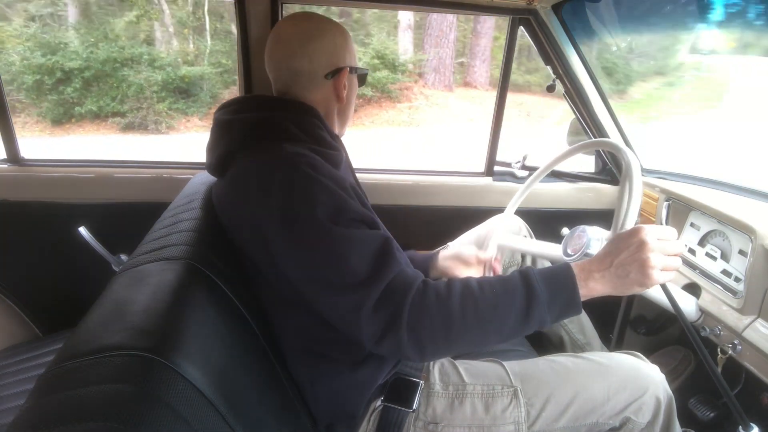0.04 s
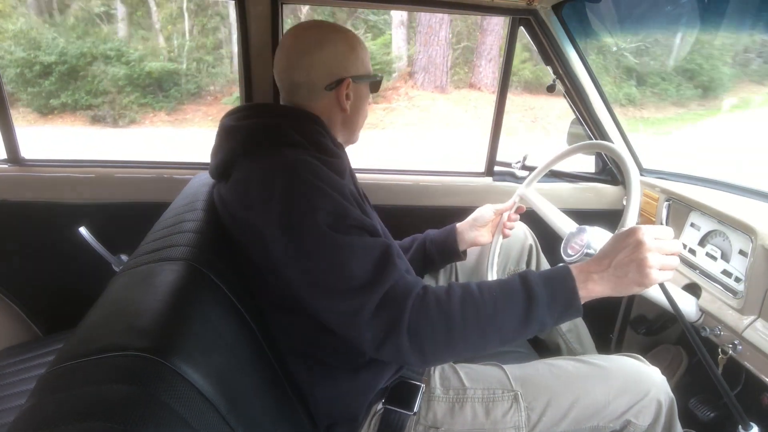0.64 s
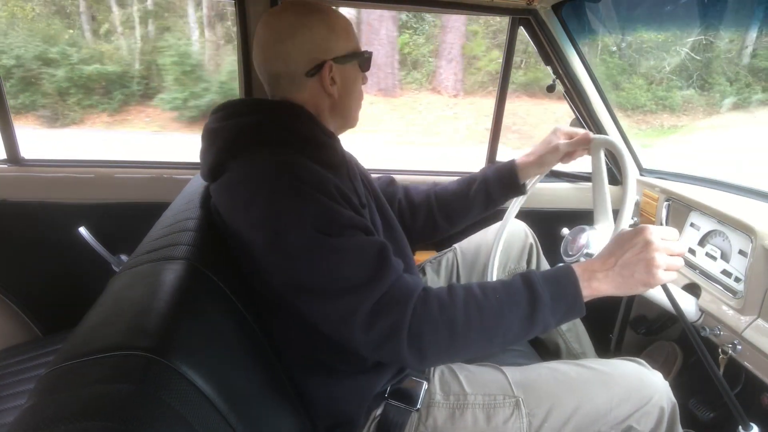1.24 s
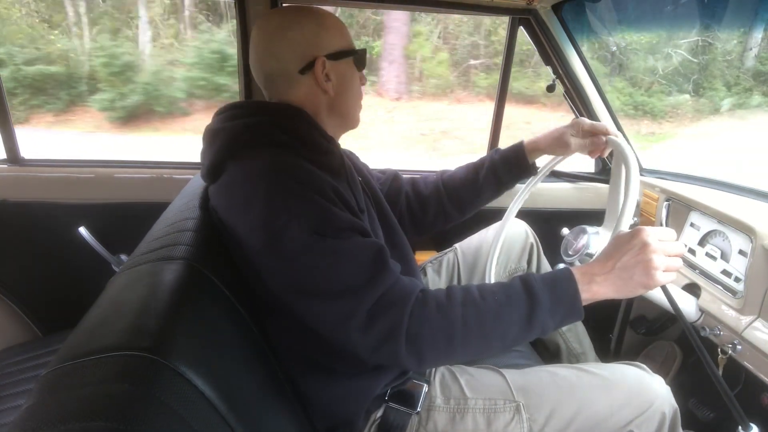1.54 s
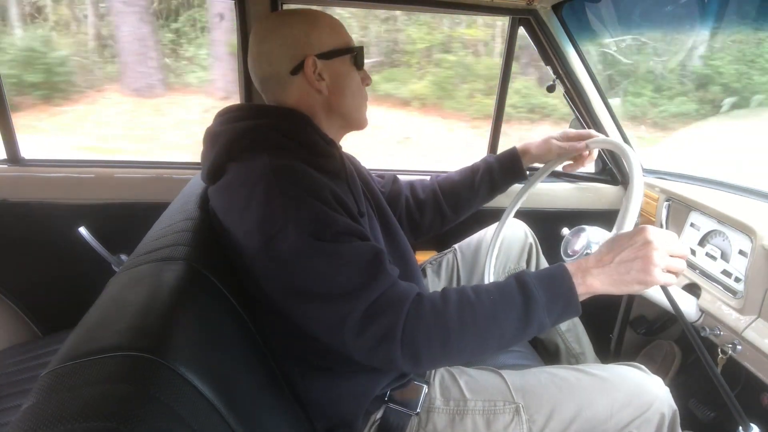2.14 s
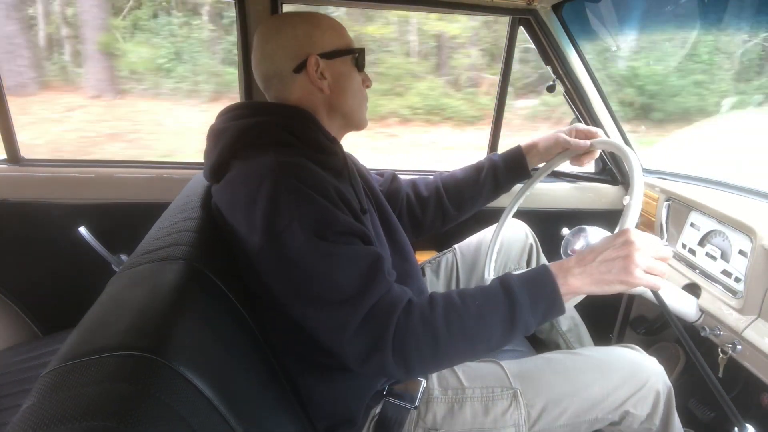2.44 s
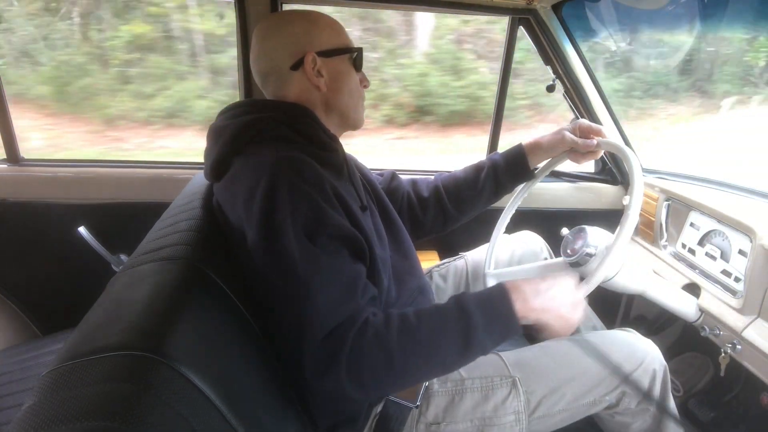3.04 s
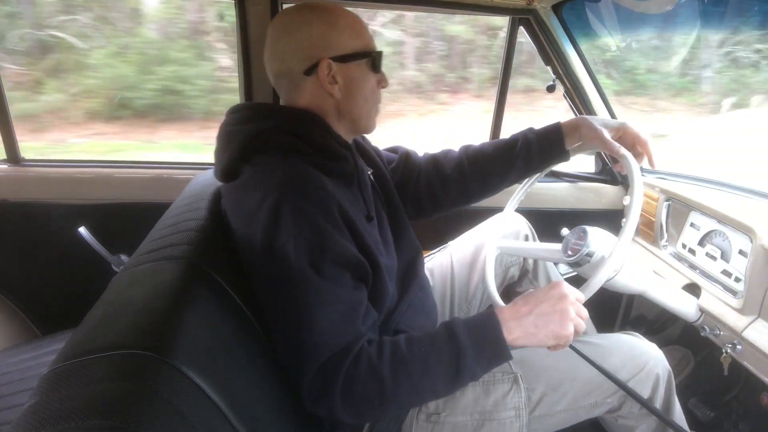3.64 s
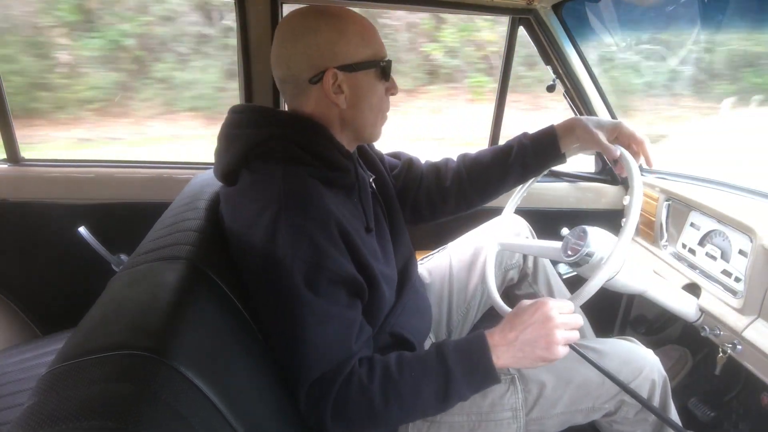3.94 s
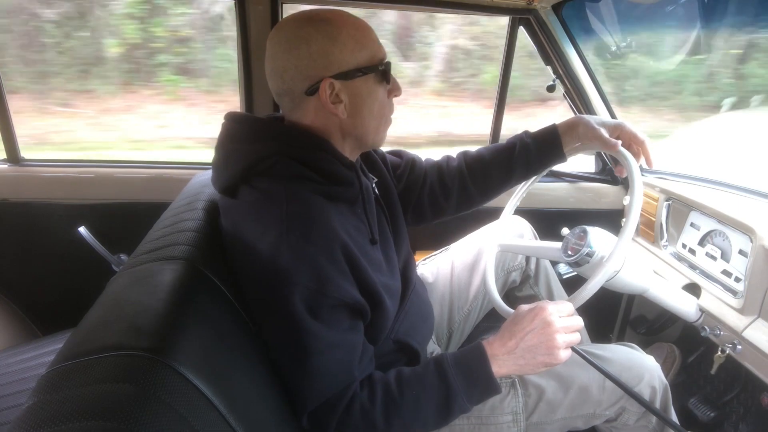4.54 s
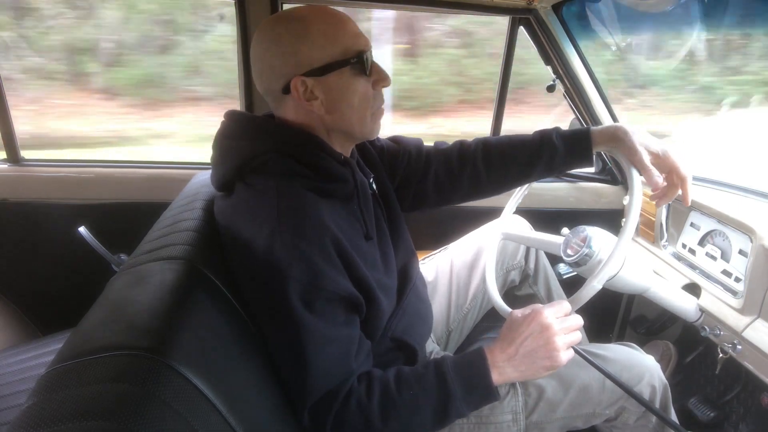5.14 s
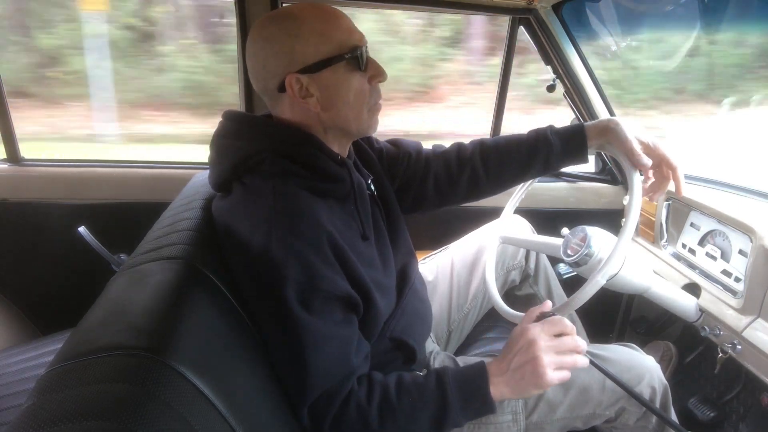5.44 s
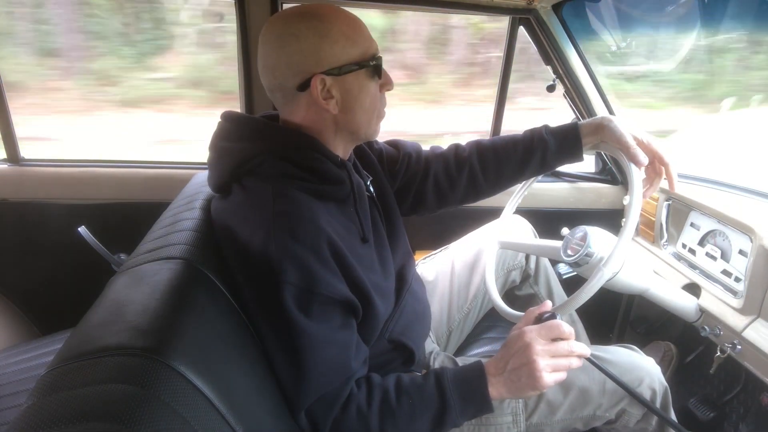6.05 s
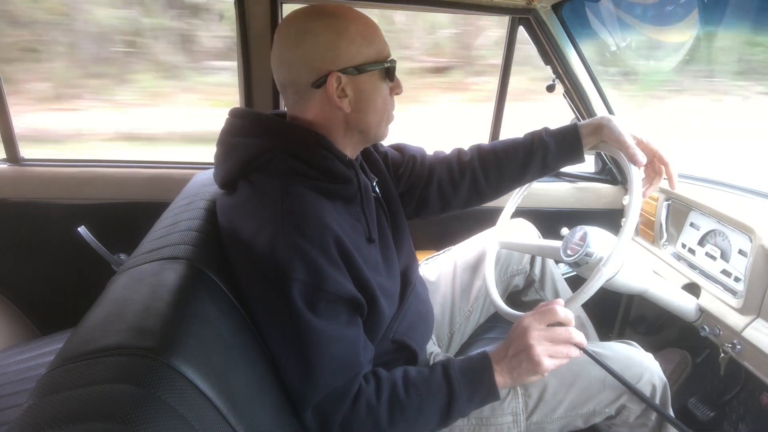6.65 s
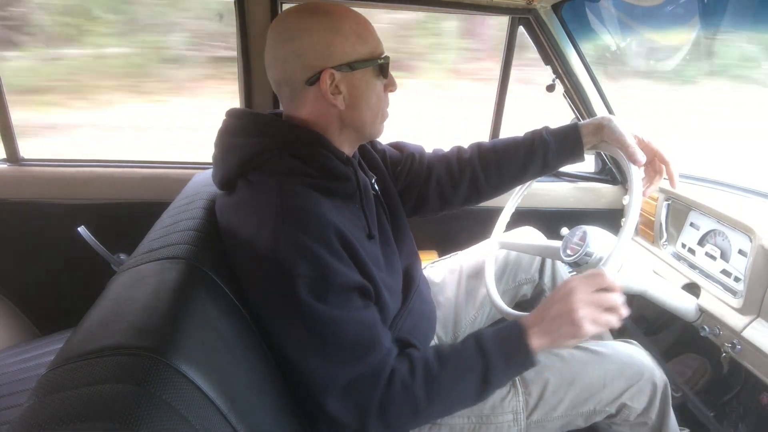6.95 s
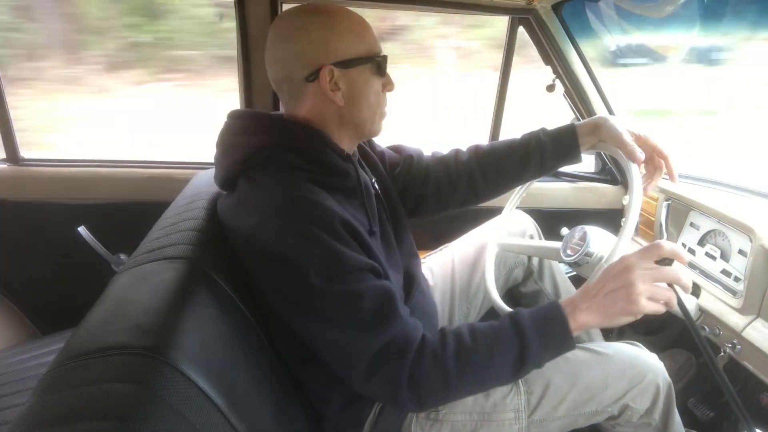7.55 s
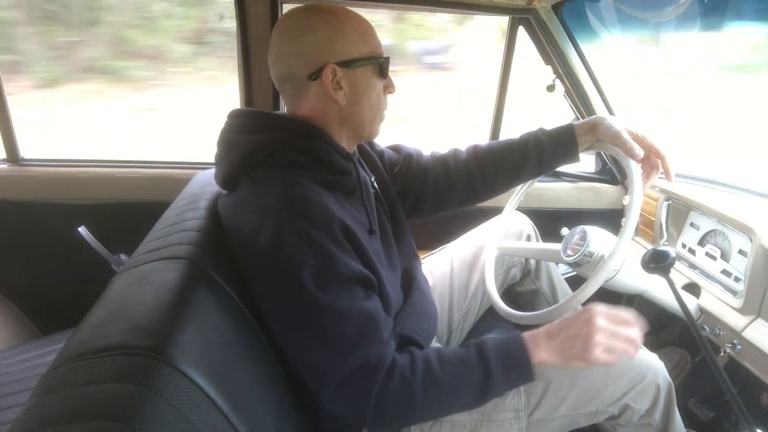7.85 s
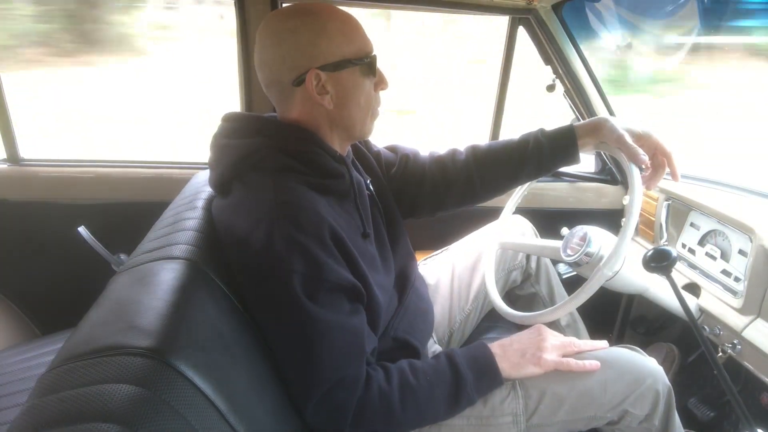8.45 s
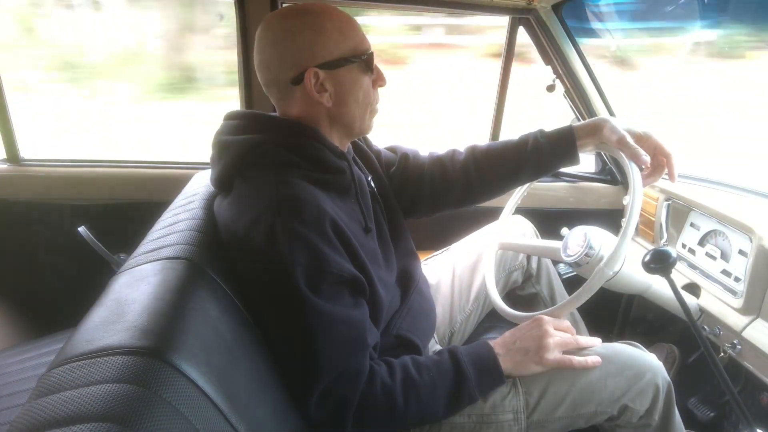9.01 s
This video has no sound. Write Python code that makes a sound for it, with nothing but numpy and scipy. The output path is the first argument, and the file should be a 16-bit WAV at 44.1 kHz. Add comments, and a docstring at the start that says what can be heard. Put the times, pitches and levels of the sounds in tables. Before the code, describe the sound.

Heard from inside the cab, an old pickup's V8 engine pulls up from low revs with a boomy drone, light clatter and faint gearbox whine over tyre rumble. The body rattles once near the start. The revs climb, drop for an upshift with a brief groan, and climb again. During a second upshift an oncoming vehicle rushes past, then the engine pulls on at lower revs.

```python
"""An old V8 pickup, heard from inside the cab, pulls out of a turn and shifts up twice.
Each exhaust order booms as it sweeps through a resonance of the cab; the engine clatters, the gearbox
whines and groans at the shifts, and the carburettor hisses and whistles under throttle.
Tyres rumble, hands work the controls, the cab booms briefly, the body rattles once, and keys tick.
During the second shift an oncoming vehicle rushes past the window."""
import sys
import numpy as np
from scipy.fft import rfft, irfft, next_fast_len
from scipy.io import wavfile
from scipy.ndimage import map_coordinates

SR = 44100
rng = np.random.default_rng(int(sys.argv[2]) if len(sys.argv) > 2 else 0)


def store_pcm(level_fs):
    """Save levels as 16-bit WAV."""
    pcm = np.round(np.clip(level_fs, -1, 1) * 32767).astype(np.int16)
    wavfile.write(sys.argv[1], SR, np.atleast_2d(pcm).T)


N = 409248


def amp(db):
    """Decibels to gain."""
    return 10 ** (np.asarray(db) / 20)


def unit(x):
    """Scale to rms 1."""
    return x / np.sqrt(np.mean(x ** 2) + 1e-20)


def clock():
    """Time of each sample in seconds."""
    return np.arange(N) / SR


def automation(points):
    """Straight lines through (time [s], value) points, one value a sample."""
    return np.interp(clock(), *np.transpose(points))


def wobble(rate):
    """A smooth random curve with `rate` knots a second."""
    knots = rng.standard_normal(int(N * rate / SR) + 4)
    coarse = clock()[::64]
    return np.interp(clock(), coarse, map_coordinates(knots, [coarse * rate]))


def filtered(x, response):
    """Equalise x with a gain that is a function of frequency."""
    size = next_fast_len(N + SR // 4)
    return irfft(rfft(x, size) * response(np.fft.rfftfreq(size, 1 / SR)), size)[:N]


def noise(eq):
    """Noise of rms 1 coloured by (frequency [Hz], level [dB]) points."""
    points_hz, db = np.transpose(eq)
    colour = lambda hz: amp(np.interp(np.log(hz + 1), np.log(points_hz), db))
    return unit(filtered(rng.standard_normal(N), colour))


def resonance(modes, hz):
    """Gain at hz of resonances given as (frequency [Hz], half width [Hz], level [dB])."""
    return np.sqrt(sum((amp(db) / (1 + ((hz - centre) / width) ** 2)) ** 2
                       for centre, width, db in modes))


def ringing(modes):
    """Noise of rms 1 heard through a set of resonances."""
    return unit(filtered(rng.standard_normal(N), lambda hz: resonance(modes, hz)))


def swell(peak_s, rise_s, fall_s):
    """A bell-shaped envelope with its own rise and fall."""
    t = clock() - peak_s
    return np.exp(-(t / np.where(t < 0, rise_s, fall_s)) ** 2)


def swells(cues):
    """An envelope of even-sided swells, one for each (time [s], level [dB], half length [s])."""
    return sum(amp(db) * swell(s, half_s, half_s) for s, db, half_s in cues)


# exhaust partials: (order [multiple of the two-turn engine cycle], pulling [dB], coasting [dB])
EXHAUST_ORDERS = [(3, -2.5, 3.0), (4, -3.5, -0.5), (5, 8.0, -6.0), (6, 6.5, 9.5), (7, -0.5, -4.0),
                  (8, 21.0, 3.0), (9, 9.0, -7.0), (10, 8.0, -14.5), (11, 10.5, -5.5), (12, -2.0, -12.5),
                  (13, 10.5, -7.5), (14, 11.0, -7.5), (15, 3.0, -14.0), (16, 16.5, 6.0), (17, -1.0, -13.0),
                  (18, 13.5, -12.0), (19, 2.0, -3.0), (20, -5.0, -3.0), (21, 5.5, -1.5), (22, 6.5, -15.0),
                  (23, 9.0, -1.0), (24, 10.0, -10.0), (25, 10.0, -12.5), (26, 5.0, -9.5), (27, 4.0, -9.5),
                  (28, 6.5, -12.5), (29, 1.5, -5.0), (30, 7.0, -9.0), (31, 4.5, -3.5), (32, 5.5, -5.5),
                  (33, 5.0, -9.5), (34, 6.5, -6.5), (35, -2.5, -11.0), (36, 9.0, -9.0), (37, -0.0, -5.0)]
# the pipe's voicing at each speed: (speed [rpm], boom [dB], drone [dB], burble [dB], rasp [dB])
PIPE_VOICING = [(1020, 4, -7, -18.5, -9), (1115, 10.0, -3, -2.5, -5), (1300, -0.5, -14, -7, 2.5),
                (1400, -1, -1, -1.5, -9), (1433, 2, -6.5, -1, -9), (1540, 0, -5, -0.5, -1.5),
                (1635, 10.5, -5, -5.5, -5.5), (1752, 2.5, -12.5, 1.5, 1), (1792, 5.5, -3, 0, 1),
                (1828, -3, 1.5, -1.5, 8), (1935, -7, 2.5, 1, 2), (2000, -10.5, 4, 1, 0),
                (2086, -17, 11, -1, 1), (2127, -2, 6, -5, 2.5), (2181, 2, 7.5, 4, -6)]
# air and panel resonances of the cab: (frequency [Hz], half width [Hz], level [dB])
CAB_MODES = [(45.7, 4, -25), (60.6, 9.7, -30.5), (88.2, 8.8, -39), (104.5, 5.1, -45), (123.9, 4.1, -33),
             (132.7, 5.7, -32), (162.5, 18, -42.5), (193.6, 6.6, -44), (233.6, 6.5, -28.9),
             (251, 5.8, -37.3), (286.3, 5.8, -50), (302, 6.4, -49.5), (340, 8, -48.5), (367, 7, -46),
             (404, 8, -45.5), (451, 9, -50.5), (505, 14, -56), (541, 14, -52.5)]


def exhaust(rpm, cycle, throttle, load_opening=0.22, unevenness=0.14):
    """Eight firings a cycle make the boom and its octave drone; uneven burns fill in the other orders."""
    load = 1 - np.exp(-throttle / load_opening)  # builds quickly, then levels off
    speeds, *voicing = np.transpose(PIPE_VOICING)
    boom, drone, burble, rasp = [amp(np.interp(rpm, speeds, db)) for db in voicing]
    cycle_hz = rpm / 120
    grid_hz = np.arange(SR // 32)
    cab_response = resonance(CAB_MODES, grid_hz)
    out = np.zeros(N)
    for order, pulling_db, coasting_db in EXHAUST_ORDERS:
        phase = 2 * np.pi * (order * cycle + rng.random())
        # no two cycles burn alike: level and phase flutter, least on the firing orders
        flutter = unevenness / 2 if order % 8 == 0 else unevenness
        tone = (1 + flutter * wobble(13)) * np.sin(phase + flutter * wobble(12))
        pipe = boom if order == 8 else drone if order == 16 else rasp if order > 20 else burble
        cab = np.interp(order * cycle_hz, grid_hz, cab_response)
        out += amp(coasting_db + (pulling_db - coasting_db) * load) * pipe * cab * tone
    return out


def engaged(start_s, end_s, clutch_s=0.2):
    """1 while a gear carries the drive, fading as the clutch bites and lets go."""
    return np.clip(np.minimum(clock() - start_s, end_s - clock()) / clutch_s + .5, 0, 1)


# each gear: (clutch bites [s], lets go [s], slip [rpm], whine [dB], octave [dB], clatter boost [dB])
GEAR_CUES = [(-.3, 2.85, 0, -40, -53.5, 1), (3.7, 6.8, 70, -44, -44.5, 0),
             (7.65, 9.6, 0, -41.5, -44.5, 2.5)]
# resonances of the gearbox case: (frequency [Hz], half width [Hz], level [dB])
CASE_MODES = [(629, 14, 3.5), (710, 35, -6), (910, 20, -4), (1250, 35, -5), (1320, 30, -5), (1410, 40, -3),
              (1495, 35, -2), (1560, 26, .5), (1668, 17, 0), (1825, 28, -9.5)]


def gearbox(rpm, teeth=26, slip_s=0.45, waver_rad=0.45, flutter_db=1.3):
    """Meshing teeth whine, flat while the clutch slips; tone and octave flare at each case resonance."""
    slip = sum(slip_rpm * swell(start, slip_s, slip_s) for start, _, slip_rpm, *_ in GEAR_CUES)
    mesh_hz = teeth * (rpm - slip) / 60
    phase = 2 * np.pi * np.cumsum(mesh_hz) / SR + waver_rad * wobble(25)
    whine = resonance(CASE_MODES, mesh_hz) * amp(flutter_db * wobble(8)) * np.sin(phase)
    octave = resonance(CASE_MODES, 2 * mesh_hz) * amp(flutter_db * wobble(23)) * np.sin(2 * phase)
    return sum(engaged(start, end) * (amp(whine_db) * whine + amp(octave_db) * octave)
               for start, end, _, whine_db, octave_db, _ in GEAR_CUES)


# ring of the steel between engine and cab: (frequency [Hz], half width [Hz], level [dB])
FIREWALL_MODES = [(410, 32, -1.5), (438.7, 7.9, 7), (545.7, 12, 10.5), (645, 23, 4.5), (716, 23, -2.5),
                  (876, 5.8, -3), (945, 27, -5.5), (1180, 17, -6), (1510, 25, -2.5), (1684, 13, -3),
                  (2135, 60, -2.5), (2493, 43, -6.5), (3180, 50, -13)]


def through_firewall(x):
    """The steel panels add their ring to a sound from the engine bay; the result has rms 1."""
    return unit(filtered(x, lambda hz: 1 + resonance(FIREWALL_MODES, hz)))


# colour of combustion and valve noise: (frequency [Hz], level [dB])
CLATTER_EQ = [(200, -35.5), (380, 4.5), (490, -2), (800, -4), (1100, 0), (1500, -7.5), (1900, -13.5),
              (2400, -15.5), (3200, -21.5), (4200, -25.5), (5000, -32), (8000, -51.5), (16000, -62.5)]


def engine_clatter(rpm, cycle, throttle, shut_db=-41, open_boost_db=4, db_per_octave=2.5):
    """Combustion and valves throb with the firings, louder with throttle and engine speed."""
    gear_db = sum(db * engaged(start, end) for start, end, *_, db in GEAR_CUES)
    speed_db = db_per_octave * np.log2(rpm / 1600)  # 0 at cruising speed
    level_db = shut_db + open_boost_db * throttle + speed_db + gear_db + 0.9 * wobble(14)
    firings = 0.15 * np.cos(2 * np.pi * 8 * cycle)
    lope = 0.043 * np.cos(2 * np.pi * cycle)
    return amp(level_db) * through_firewall(noise(CLATTER_EQ) * (1 + firings + lope))


# colour of the intake air: (frequency [Hz], level [dB])
INTAKE_EQ = [(1000, -34.5), (2500, 0.5), (4200, -1), (4900, -3.5), (5700, 0), (7000, -4.5), (8300, -10.5),
             (10400, -15), (12000, -16), (15500, -21)]


def intake_hiss(cycle, throttle, shut_db=-64.5, open_boost_db=8.5):
    """The carburettor hisses as the throttle opens, pulsing faintly with the firings."""
    pulse = 1 + 0.062 * np.cos(2 * np.pi * 8 * cycle)
    level_db = shut_db + open_boost_db * throttle + 1.1 * wobble(13)
    return amp(level_db) * through_firewall(noise(INTAKE_EQ) * pulse)


# fader ride of the tyres, following the coarseness of the road: (time [s], level [dB])
TYRE_FADER = [(0, -32.5), (.8, -25.5), (1.3, -24), (2, -28.5), (2.6, -29.5), (3.15, -26.5), (3.42, -25),
              (3.57, -31.5), (3.74, -25), (4.7, -26.5), (5.2, -32), (6, -31.5), (6.85, -27.5), (7.2, -22.5),
              (8.3, -24.5), (9.28, -27)]
# swells of low rumble, from the road and from the engine shuddering during the shifts:
# (time [s], level [dB], half length [s])
RUMBLE_SWELLS = [(0.603, -42, 0.059), (1.9, -32.5, 0.17), (3.06, -27.5, 0.27), (3.424, -23.5, 0.07),
                 (4.85, -32.5, 0.32), (6.256, -27, 0.15), (7.047, -28, 0.081), (7.423, -24, 0.042),
                 (7.72, -34, 0.19), (8.35, -28, 0.24)]
# colours of the tyre rumble and the floor pan's sub-bass: (frequency [Hz], level [dB])
TYRE_EQ = [(30, -31), (65, -9.5), (90, -2), (125, 1), (155, -7.5), (185, -6), (208, -9.5), (236, -2),
           (275, -10.5), (302, -8), (325, -13.5), (400, -18), (490, -25), (2500, -120)]
FLOOR_EQ = [(15, -34), (28, -17), (42, 3), (56, 2), (72, -0.5), (100, -8), (200, -53.5), (500, -120)]


def tyres_and_floor(floor_trim_db=-7, flutter_db=1.4):
    """Tyre rumble fills the cab; the floor pan trembles with it and swells with road and engine shudder."""
    roll_db = automation(TYRE_FADER)
    shake = (amp(roll_db + floor_trim_db) + swells(RUMBLE_SWELLS)) * noise(FLOOR_EQ)
    rumble = amp(roll_db + flutter_db * wobble(7)) * noise(TYRE_EQ)
    return shake + rumble


# strokes of a hand: (time [s], level [dB], half length [s])
SLIDE_CUES = [(0.27, -54, 0.037), (0.34, -42, 0.09), (.53, -48.5, .02), (3.117, -45, 0.021)]
# colour of the rubbing: (frequency [Hz], level [dB])
SLIDE_EQ = [(400, -22), (850, -9), (1130, 11), (1300, 2), (1520, 10), (1800, -2.5), (2500, -3), (3900, -13),
            (5200, -33.5), (12000, -50.5)]


def hand_slides():
    """Hands slide on the wheel and lever in soft swells of midrange friction."""
    return swells(SLIDE_CUES) * noise(SLIDE_EQ)


# short low booms in the cab, one from the engine as it coasts: (time [s], level [dB], pitch [Hz])
BOOM_CUES = [(0.656, -12, 104), (3.135, -15.5, 185), (7.124, -11.5, 105), (7.579, -14.5, 239),
             (7.997, -18.5, 390)]


def cab_booms(fall_cycles=1.43):
    """The cab booms for a few cycles, rising twice as fast as it falls."""
    out = np.zeros(N)
    for s, db, hz in BOOM_CUES:
        fall_s = fall_cycles / hz
        out += amp(db) * swell(s, fall_s / 2, fall_s) * np.cos(2 * np.pi * hz * (clock() - s))
    return out


def struck(hits, modes, scrape_gain, scrape_t60):
    """Each hit rings the modes at slightly new strengths, over a short scrape of noise."""
    out = np.zeros(N + SR)
    t = np.arange(SR // 3) / SR
    attack = 1 - np.exp(-t / 0.00089)
    for s, db in hits:
        ring = np.zeros(len(t))
        for hz, mode_db, t60 in modes:
            decay = amp(mode_db + rng.normal(0, 0.67) - 60 * t / t60)
            ring += decay * np.sin(2 * np.pi * (hz * t + rng.random()))
        scrape = scrape_gain * amp(-60 * t / scrape_t60) * rng.standard_normal(len(t))
        out[round(s * SR):][:len(t)] += amp(db) * (ring + scrape) * attack / 2
    return out[:N]


# one loud cluster of knocks, then faint scattered ticks: (time [s], level [dB])
KNOCK_CUES = [(.668, -26), (.674, -22), (.682, -24), (.689, -25.5), (1.367, -39), (2.188, -41),
              (3.119, -45), (5.511, -43), (8.493, -39)]
# their ring: (frequency [Hz], level [dB], 60 dB decay [s])
KNOCK_MODES = [(444, 1, 0.2), (570, -2, 0.088), (640, -7, 0.094), (825, -2.5, 0.078), (908, -2.5, 0.076),
               (1088, 1, 0.063), (1330, -10, 0.078), (1730, -18, 0.036), (2260, -19, .04),
               (2970, -29, 0.045)]


def knocks(rattle_s=0.678, rattle_db=-29):
    """A cluster of knocks rings over a dull rattle of bodywork; faint scattered ticks follow."""
    rattle_eq = [(200, -27), (420, 11), (650, 4), (1050, -2), (1500, -5), (2200, -15),
                 (4000, -28), (9000, -68)]
    rattle = amp(rattle_db) * swell(rattle_s, 0.0097, 0.023) * noise(rattle_eq)
    return struck(KNOCK_CUES, KNOCK_MODES, scrape_gain=.005, scrape_t60=.04) + rattle


# grabs at the wheel: (time [s], level [dB], fall [s])
GRAB_CUES = [(0.92, -56.5, 0.02), (1.062, -62, 0.018)]
# colour of skin on the rim: (frequency [Hz], level [dB])
SKIN_EQ = [(2000, -26), (4000, -1.5), (6500, 3), (9000, -7), (12000, -10), (15500, -11.5)]


def wheel_grabs():
    """Fingers catch the wheel rim in bright scuffs with a fast attack."""
    envelope = sum(amp(db) * swell(s, fall_s / 4, fall_s) for s, db, fall_s in GRAB_CUES)
    return envelope * noise(SKIN_EQ)


# bright touches: a faint one as the hand catches the wheel, then the keys: (time [s], level [dB])
KEY_CUES = [(1.068, -62), (2.498, -55), (2.503, -51.5), (2.509, -54), (2.523, -60)]
# their ring: (frequency [Hz], level [dB], 60 dB decay [s])
KEY_MODES = [(3100, 4, .04), (3500, 1, .03), (3800, 3, 0.035), (4220, 1, .04), (5080, -1, .04),
             (5500, -4, .03), (6620, -3, 0.09), (7600, -13, 0.06), (8900, -18, .06)]


def key_ticks():
    """A faint ring as the hand catches the wheel, then dangling keys touch with a short, bright ring."""
    return struck(KEY_CUES, KEY_MODES, scrape_gain=.15, scrape_t60=.08)


# the next gear rubs into mesh: (time [s], level [dB], half length [s])
SYNCHRO_CUES = [(3.5, -45, .07), (3.628, -34, 0.059), (7.517, -38, 0.1)]
# resonances of the groan: (frequency [Hz], half width [Hz], level [dB])
GROAN_MODES = [(297, 12, 1.5), (598, 23, -10.5), (910, 20, -21)]


def synchro_groans():
    """At each shift the gearbox groans briefly as the next gear is dragged up to speed."""
    return swells(SYNCHRO_CUES) * ringing(GROAN_MODES)


# airy intake tones: (time [s], half length [s], pitch [Hz], level [dB])
WHISTLE_CUES = [(4.7, .6, 4250, -71), (5, .18, 3680, -67.5), (5.7, .6, 4220, -69), (6.26, .26, 3680, -66)]


def intake_whistle(half_width_hz=22, flicker_db=1.5):
    """In the middle pull, air drawn through the carburettor sings in two thin tones that come and go."""
    out = np.zeros(N)
    for s, half_s, hz, db in WHISTLE_CUES:
        envelope = amp(db + flicker_db * wobble(6.7)) * swell(s, half_s, half_s)
        out += envelope * ringing([(hz, half_width_hz, 0)])
    return out


# front and rear tyres of the oncoming vehicle: (time when nearest [s], level [dB])
AXLE_CUES = [(7.229, -34), (7.47, -33.5)]
# colour of their roar: (frequency [Hz], level [dB])
PASS_BY_EQ = [(150, -25.5), (400, -6.5), (750, -5.5), (950, 6), (1300, 2.5), (1700, -6.5), (2200, -14),
              (3500, -20), (6000, -29), (9000, -41.5), (16000, -73.5)]


def pass_by(gap_m=2.9, speed_m_per_s=13.8, abreast_s=7.19, hiss_db=-53, tail_db=-45):
    """Oncoming tyres roar past axle by axle, hiss abreast of the window and leave a thinner tail."""
    roar = np.zeros(N)
    for s, db in AXLE_CUES:
        nearness = gap_m / np.hypot(gap_m, speed_m_per_s * (clock() - s))
        # squared: the roar falls once with distance and once more with its slant to the side window
        roar += amp(db + 1.8 * wobble(22)) * nearness ** 2 * noise(PASS_BY_EQ)
    hiss_eq = [(1500, -24), (4000, 2), (6500, 0), (9000, -10), (15500, -18)]
    tail_eq = [(300, -43), (1100, -15), (1550, 2), (1850, -6), (2300, -12), (9000, -43)]
    hiss = amp(hiss_db) * swell(abreast_s, 0.02, 0.11) * noise(hiss_eq)
    tail = amp(tail_db) * swell(7.7, 0.16, 0.31) * noise(tail_eq)
    return roar + hiss + tail


# the revs, three pulls with two upshifts between them: (time [s], crankshaft speed [rpm])
REVS = [(0, 940), (.4, 1077), (1, 1387), (1.4, 1563), (1.8, 1748), (2.25, 1987), (2.6, 2130), (2.8, 2123),
        (3.2, 1788), (3.5, 1630), (3.68, 1416), (4.1, 1536), (4.3, 1521), (4.6, 1609), (5.2, 1793),
        (5.6, 1917), (6.2, 2104), (6.55, 2169), (6.85, 2190), (7.2, 1992), (7.45, 1814), (7.68, 1399),
        (8, 1414), (8.4, 1467), (9.28, 1561)]
# the accelerator, lifted for each shift: (time [s], opening [0-1])
PEDAL = [(0, 0.28), (.65, 0.17), (1.6, 0.6), (2.35, 0.51), (2.75, 0.24), (3, 0.03), (3.6, 0.08),
         (3.76, 0.79), (5.15, 0.82), (5.55, 0.43), (6.28, 0.53), (6.5, 0.27), (6.8, 0.15), (7, 0.04),
         (7.55, 0.08), (8.2, 1), (8.8, 0.73), (9.28, 0.87)]


def scene():
    """Revs and throttle play the engine, revs the gearbox; rumble, foley and pass-by join in mono."""
    rpm = automation(REVS)
    throttle = automation(PEDAL)
    cycle = np.cumsum(rpm / 120) / SR  # engine cycles so far, two crank turns each
    engine = exhaust(rpm, cycle, throttle) + engine_clatter(rpm, cycle, throttle)
    intake = intake_hiss(cycle, throttle) + intake_whistle()
    gears = gearbox(rpm) + synchro_groans()
    foley = hand_slides() + cab_booms() + knocks() + wheel_grabs() + key_ticks()
    return (engine + intake + gears + tyres_and_floor() + foley + pass_by())[None]


def record(dry):
    """A brick-wall high cut takes off the very top of the treble."""
    high_cut_hz = 15720
    return filtered(dry[0], lambda hz: hz < high_cut_hz)[None]


dry = scene()
out = record(dry)
store_pcm(out)
```